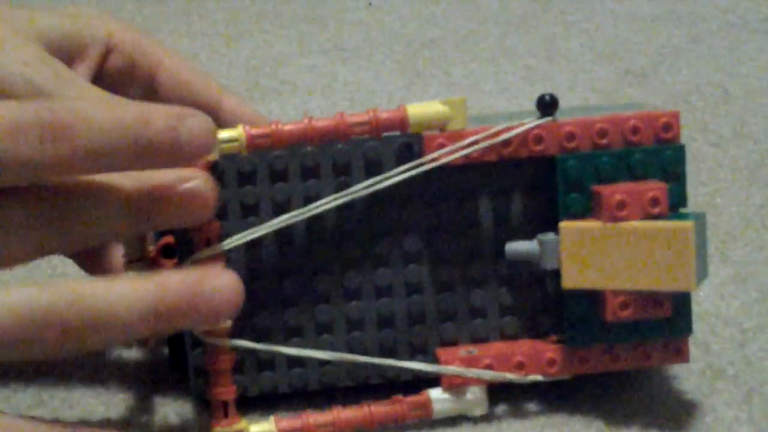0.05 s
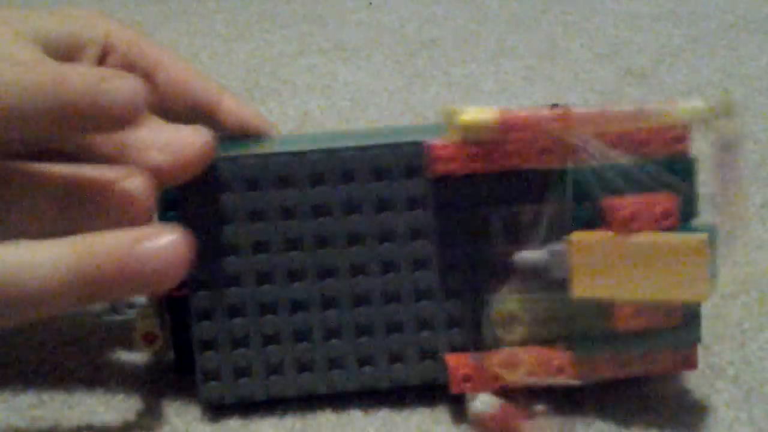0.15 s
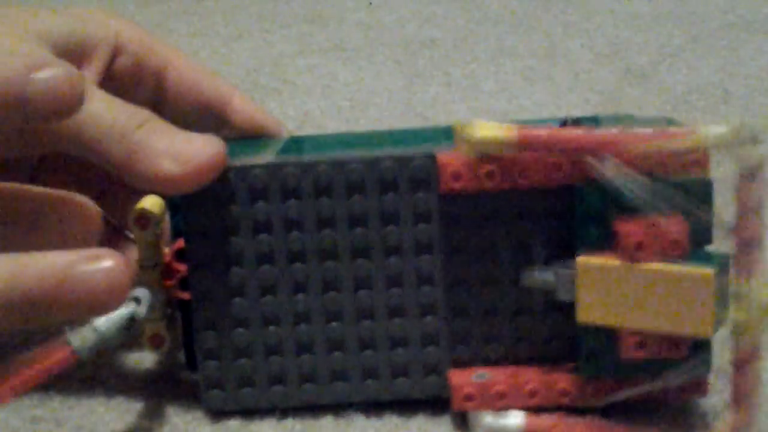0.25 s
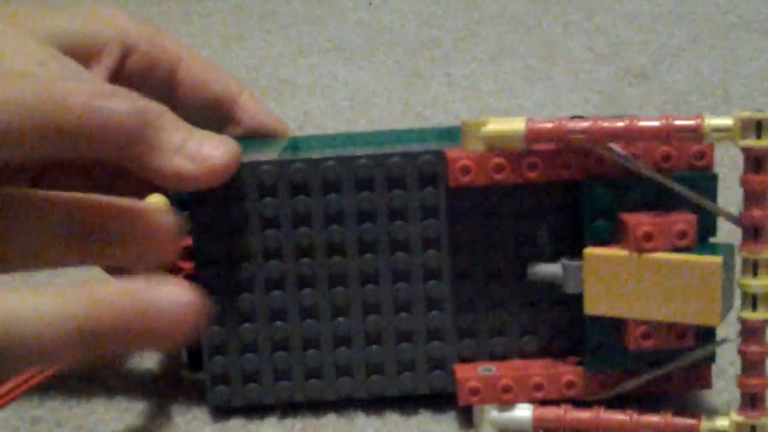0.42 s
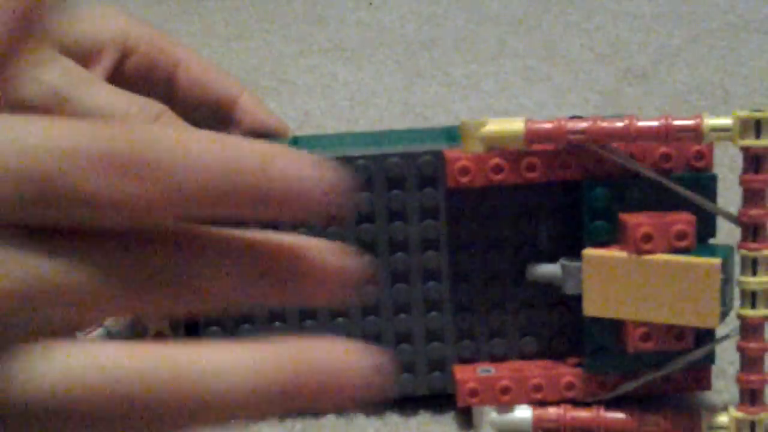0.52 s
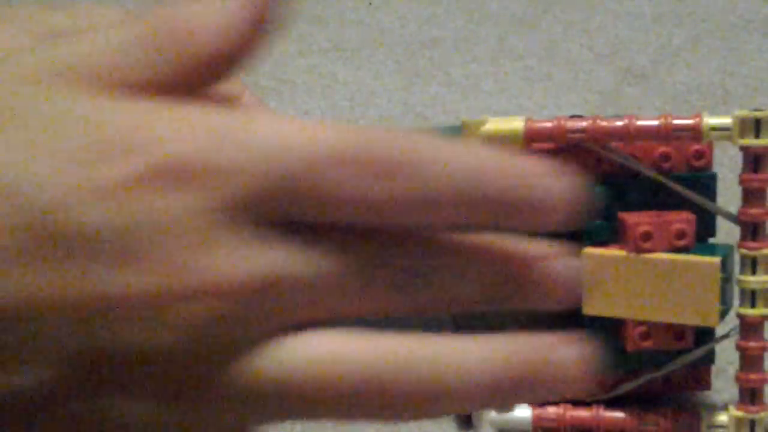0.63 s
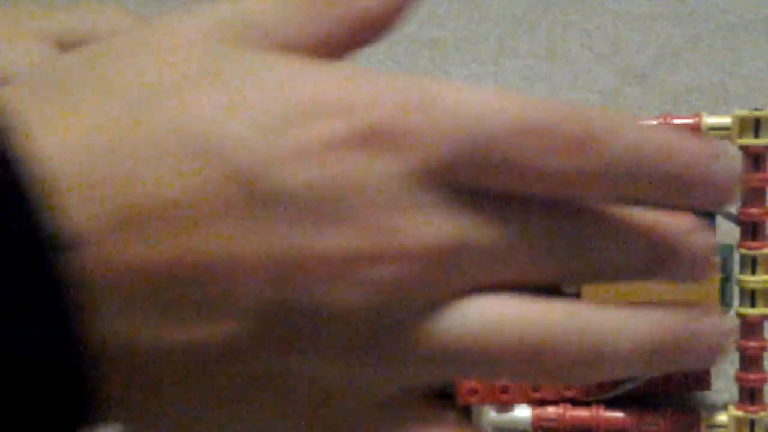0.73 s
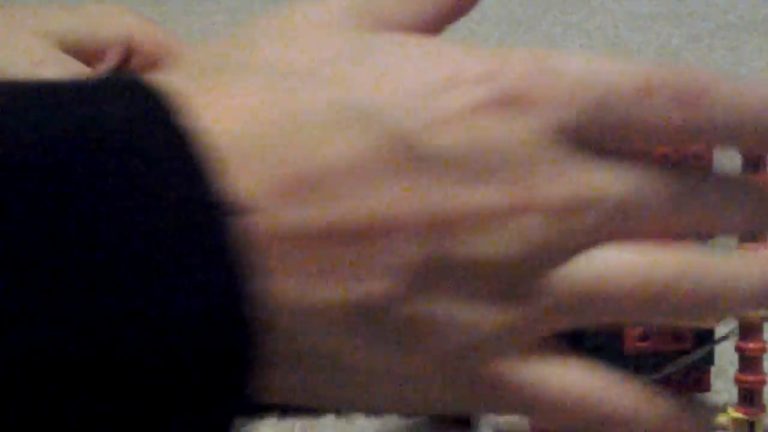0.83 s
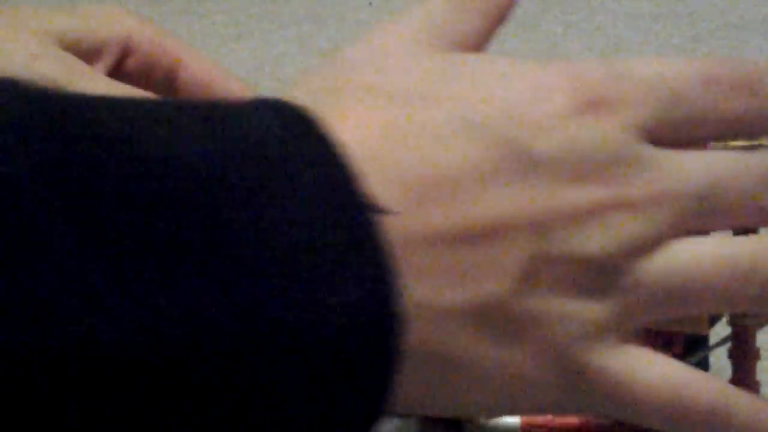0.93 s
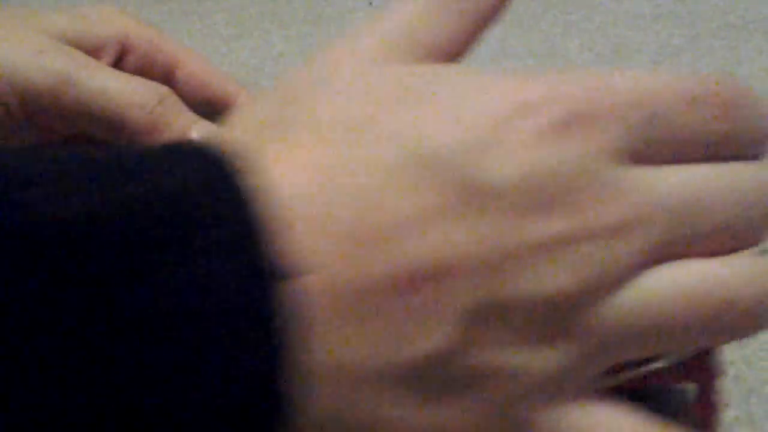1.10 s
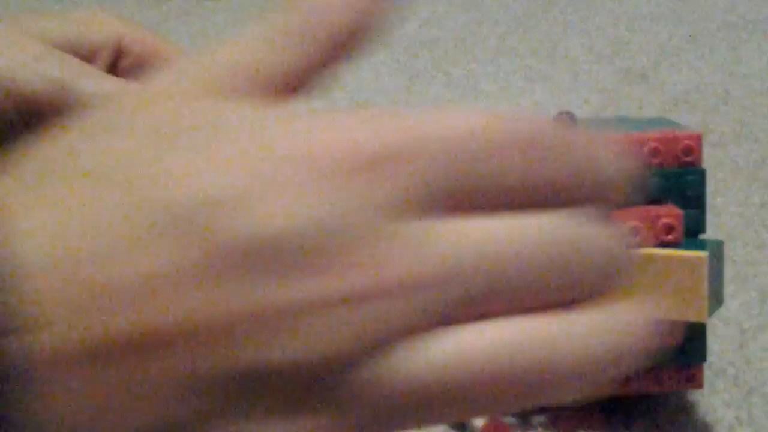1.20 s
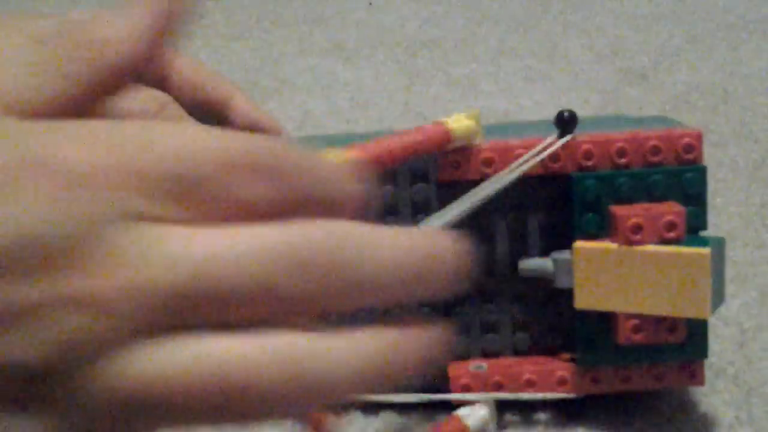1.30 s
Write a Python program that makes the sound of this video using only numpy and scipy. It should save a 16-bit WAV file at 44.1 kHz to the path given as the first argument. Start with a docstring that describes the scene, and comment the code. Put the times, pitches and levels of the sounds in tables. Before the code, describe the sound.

A plastic brick trap snaps shut: after quiet room hiss, a tiny catch click and brief scrape at 0.2 s lead into a loud, bright clack at 0.21 s. Six hard bounces follow about every 0.05 s, fading by 0.53 s, with brick chatter, dull carpet thuds and short room echoes. Soft hand rustle continues, with faint plastic taps near 1.02 and 1.10 s. Close microphone, small carpeted room.

```python
"""A toy mousetrap of plastic bricks snaps shut on a carpet in a small room, close to the microphone.
Room noise and a hand's rustle (shaped noise) run throughout; the arm's hinge scrapes in a swell of noise.
Catch, snap and six bounces follow: modes of base and arm ring, noise cracks, loose bricks chatter,
the base thuds on the carpet and the walls throw each clack back. Later a hand taps the trap three times."""
import sys
import numpy as np
from scipy import signal
from scipy.fft import irfft
from scipy.io import wavfile

SR = 44100
rng = np.random.default_rng(int(sys.argv[2]) if len(sys.argv) > 2 else 0)


def bounce(signal):
    """Save signal as a 16-bit WAV file at the path given by the first command-line argument."""
    frames = np.transpose(np.atleast_2d(signal))
    limited = np.clip(frames, -1, 1)
    pcm = np.round(limited * 32767).astype(np.int16)
    wavfile.write(sys.argv[1], SR, pcm)


N = 59535

# Room noise and microphone hiss: frequency_hz, relative_density_db
FLOOR_SPECTRUM = [(15, -52), (25, -31), (97, -2.5), (228, -3.5), (349, -6), (644, -9.5), (775, -7.5),
                  (934, -14), (1360, -12), (1970, -18), (2190, -14.5), (6350, -22), (14500, -17.5)]
# Moving hand and sleeve: time_s, level_db
RUSTLE_LEVEL = [(0, -80), (.14, -76), (0.191, -53.5), (.6, -57), (.75, -65), (.95, -58.5), (1.12, -59.5),
                (1.35, -76.5)]
# Spectrum of rustle and hinge scrape: frequency_hz, relative_level_db
FRICTION_SPECTRUM = [(60, -13), (200, 4.5), (600, -0.5), (2000, -2.5), (5000, -7.5), (9000, -8.5),
                     (15000, -20)]
# Catch, snap, six bounces, three hand taps, each level relative to its layer:
# start_s, base_knock_db, arm_ring_db, favoured_pitch_hz, crack_db, chatter_db, thud_db
BLOWS = [ (0.203, -27, -36, 7000, -20.5, -34, -44), (.2100, 0, 3, 7100, -1.5, -1.5, -8),
         (0.2703, -7, 2, 3430, -4.5, -1.5, -8.5), (0.3262, -4.5, -5, 7700, -2, -6, -5),
         (0.3792, -11, -1.5, 2800, -11, -14.5, -9), (0.4296, -14.5, -10, 3300, -13.5, -19, -9),
         (0.4784, -20.5, -20, 2870, -19, -23, -5.5), (0.5264, -25, -26, 2730, -25, -26.5, -11.5),
         (1.0162, -33.5, -33, 2750, -40, -47, -50), (1.0227, -28.5, -32, 6200, -34, -48, -32),
         (1.1020, -46, -44, 2600, -56, -58, -46), ]
# Nominal modes of the hollow base: pitch_hz, level_db, t60_s
BASE_MODES = [(220, -27.5, .035), (351, -24, 0.036), (589.5, -18.5, 0.044), (864, -16, .017),
              (1028, -13.5, 0.02), (1218, -12, 0.023), (1399, -21.5, 0.015), (1666, -23.5, 0.026)]
# Nominal modes of the arm and its pegs: pitch_hz, level_db, t60_s
ARM_MODES = [(2484, -24.5, 0.049), (2798, -24, 0.025), (3140, -21, 0.023), (3470, -21.5, 0.024),
             (3746, -26, 0.019), (4890, -24, 0.015), (6150, -32, .025), (6560, -24, 0.029),
             (7180, -22, .018), (7800, -28, .018)]
# Dense high modes of the bricks: frequency_hz, relative_level_db
CRACK_SPECTRUM = [(100, -28), (400, -9), (1000, -2), (1900, -10), (3000, -3), (4700, -3), (5800, -5),
                  (7400, 1.5), (9200, -6), (12000, -10.5), (15000, -19)]
# Reflections from nearby surfaces: delay_s, gain_db
NEAR_ECHOES = [(.0022, -12), (.0058, -17.5), (0.016, -12.5), (.0205, -13.5), (.0245, -19.5)]
# Room bands: frequency_hz, first_wall_echoes_db, tail_db, tail_t60_s
ROOM_BANDS = [(120, -25, -24, .3), (300, -13, -11, 0.44), (606, -15.5, -10, 0.31), (1230, -13, -10, 0.31),
              (2340, 2.5, -1, 0.22), (4750, 2, 0, 0.24), (7500, -2.5, -0.5, 0.25), (14000, -7.5, -3, 0.29)]

FLOOR_DB = -56
SWING_START_S, SWING_END_S, SWING_END_DB, SWING_GROWTH_DB = 0.188, 0.21, -36.5, 22
STRIKE_SPREAD_DB, DETUNE_RATIO = 1.5, 0.017  # standard deviations per mode and strike
FOCUS_DB, FOCUS_OCTAVES = 5.5, 0.24  # greatest cut away from the favoured pitch; width
CRACK_DB, CRACK_RISE_S, CRACK_T60_S = -9, 0.00071, 0.016
DULLING_ABOVE_HZ, DULLING_PER_OCTAVE = 7500, 0.35  # dB per octave per dB of crack level
CHATTER_DB, CHATTER_DELAY_S, CHATTER_T60_S = -15, 0.0055, 0.054
CLICKS_PER_S, CLICK_T60_S = 900, 0.0046
LOW_CUT_HZ = 175  # the trap's blows carry little sound below this
THUD_DB, THUD_HZ, THUD_DELAY_S, THUD_WIDTH_S = -25, 223.5, 0.00807, 0.004
LANDING_DB = -11  # added to the blow's thud_db
BOOM_DB, BOOM_HZ, BOOM_T60_S = -39.5, 75.5, 0.033
BOOM_GROWTH = 1.9  # dB per dB of knock: only hard blows shake the floor
WALLS_S, WALLS_RISE_S, WALLS_T60_S, TAIL_RISE_S = 0.0139, 0.0043, 0.064, 0.011
BAND_EDGE_HZ, CEILING = 14850, 0.62  # ceiling in full-scale amplitude


def amp(db):
    """Decibels to gain."""
    return 10 ** (np.asarray(db) / 20)


def evened(x):
    """Scales to unit rms."""
    return x / np.sqrt(np.mean(x ** 2) + 1e-20)


def read(points, hz):
    """Interpolates a spectrum table on a log-frequency axis."""
    point_hz, value = np.transpose(points)
    return np.interp(np.log(hz + 1), np.log(point_hz + 1), value)


def fade(t, t60_s):
    """Exponential decay of 60 dB in t60_s."""
    return np.exp(-np.log(1000) * np.maximum(t, 0) / t60_s)


def add(mix, start_s, sound):
    """Mixes a sound in at a time."""
    part = mix[max(round(start_s * SR), 0):][:len(sound)]
    part += sound[:len(part)]


def noise(spectrum, size):
    """Random-phase noise of unit rms with the given spectrum."""
    hz = np.fft.rfftfreq(size, 1 / SR)
    phase = np.exp(2j * np.pi * rng.random(len(hz)))
    return evened(irfft(amp(read(spectrum, hz)) * phase, size))


def room_floor():
    """Steady room noise and microphone hiss."""
    return amp(FLOOR_DB) * noise(FLOOR_SPECTRUM, N)


def rustle():
    """Skin and cloth slide around the trap: friction noise under a slow level curve."""
    level_db = np.interp(np.arange(N) / SR, *np.transpose(RUSTLE_LEVEL))
    return amp(level_db) * noise(FRICTION_SPECTRUM, N)


def swing():
    """The arm scrapes in its hinge, louder as it gathers speed."""
    out = np.zeros(N)
    progress = np.linspace(0, 1, round((SWING_END_S - SWING_START_S) * SR))
    level_db = SWING_END_DB - SWING_GROWTH_DB * (1 - progress)
    scrape = noise(FRICTION_SPECTRUM, N)[:len(progress)]
    add(out, SWING_START_S, amp(level_db) * scrape)
    return out


def ring(modes, t):
    """Decaying modes, struck with slightly different weights and pitches each time."""
    total = np.zeros(len(t))
    for k, (hz, db, t60_s) in enumerate(modes):
        level_chance, pitch_chance = rng.standard_normal(2)
        level = (-1) ** k * amp(db + STRIKE_SPREAD_DB * level_chance)  # alternating polarity
        pitch_hz = hz * (1 + DETUNE_RATIO * pitch_chance)
        total += level * fade(t, t60_s) * np.sin(2 * np.pi * pitch_hz * t)
    return total


def arm_modes(favoured_hz):
    """The place where the arm lands decides which of its modes ring most."""
    modes = []
    for hz, db, t60_s in ARM_MODES:
        distance = np.log2(hz / favoured_hz) / FOCUS_OCTAVES
        cut_db = FOCUS_DB * (1 - np.exp(-distance ** 2))
        modes.append((hz, db - cut_db, t60_s))
    return modes


def crack(level_db, t):
    """Dense brick modes as a noise burst; a softer contact is duller."""
    spectrum = []
    for hz, db in CRACK_SPECTRUM:
        octaves_above = max(np.log2(hz / DULLING_ABOVE_HZ), 0)
        spectrum.append((hz, db + DULLING_PER_OCTAVE * level_db * octaves_above))
    envelope = np.minimum(t / CRACK_RISE_S, 1) * fade(t, CRACK_T60_S)
    return amp(CRACK_DB + level_db) * noise(spectrum, len(t)) * envelope


def chatter(t):
    """Loose bricks click against each other: noise under random click envelopes."""
    happens = rng.random(len(t)) < CLICKS_PER_S / SR
    clicks = happens * rng.uniform(0.79, 1, len(t))
    clicks[0] = 1
    power = signal.fftconvolve(clicks ** 2, fade(t, CLICK_T60_S) ** 2)[:len(t)]
    envelope = evened(np.sqrt(abs(power)))
    return envelope * noise(CRACK_SPECTRUM, len(t)) * fade(t, CHATTER_T60_S)


def room(x, size):
    """Near reflections, a bright cluster of wall echoes and a short tail, scattered anew per call."""
    t, hz = np.arange(size) / SR, np.fft.rfftfreq(size, 1 / SR)
    wall_phase, tail_phase = np.exp(2j * np.pi * rng.random((2, len(hz))))
    wall_rise = np.clip((t - WALLS_S) / WALLS_RISE_S, 0, 1)
    cluster = evened(wall_rise * fade(t - WALLS_S, WALLS_T60_S))
    wall_gain = amp(read([row[:2] for row in ROOM_BANDS], hz))
    response = cluster * irfft(wall_phase * wall_gain, size)
    for (_, _, tail_db, t60_s), shares in zip(ROOM_BANDS, np.eye(len(ROOM_BANDS))):
        # Triangular bands cross-fade between neighbours
        band = read([(row[0], share) for row, share in zip(ROOM_BANDS, shares)], hz)
        envelope = evened(np.minimum(t / TAIL_RISE_S, 1) * fade(t, t60_s))
        response += amp(tail_db) * irfft(tail_phase * band, size) * envelope
    for delay_s, db in NEAR_ECHOES:
        add(response, delay_s, amp([db]))
    return signal.fftconvolve(x, response)


def trap():
    """Every blow rings base and arm, cracks, shakes the bricks and excites the room."""
    out, t = np.zeros(N), np.arange(SR // 5) / SR
    for start_s, knock_db, arm_db, favoured_hz, crack_db, chatter_db, _ in BLOWS:
        blow = amp(knock_db) * ring(BASE_MODES, t)
        blow += amp(arm_db) * ring(arm_modes(favoured_hz), t)
        blow += crack(crack_db, t)
        add(blow, CHATTER_DELAY_S, amp(CHATTER_DB + chatter_db) * chatter(t))
        add(out, start_s, blow)
        add(out, start_s, room(blow, size=16384))
    low_cut = signal.butter(4, LOW_CUT_HZ, "high", fs=SR, output="sos")
    return signal.sosfilt(low_cut, out)


def thuds():
    """The base is pushed into the carpet and rocks back: dead thud, light landing knock, faint boom."""
    out, t = np.zeros(N), np.arange(SR // 10) / SR
    from_peak_s = t - THUD_DELAY_S
    pulse = np.exp(-(from_peak_s / THUD_WIDTH_S) ** 2) * np.cos(2 * np.pi * THUD_HZ * from_peak_s)
    boom = fade(t, BOOM_T60_S) * np.sin(2 * np.pi * BOOM_HZ * t)
    for start_s, knock_db, *_, thud_db in BLOWS:
        add(out, start_s, amp(THUD_DB + thud_db) * pulse)
        landing = amp(LANDING_DB + thud_db) * ring(BASE_MODES[1:4], t)
        add(out, start_s + THUD_DELAY_S, landing)
        add(out, start_s, amp(BOOM_DB + BOOM_GROWTH * knock_db) * boom)
    return out


def scene():
    """The trap in its room over a quiet floor, one channel."""
    return (room_floor() + rustle() + swing() + trap() + thuds())[None]


def record(dry):
    """The microphone rounds off the highest peaks; then the band limit."""
    rounded = CEILING * np.tanh(dry / CEILING)
    low_pass = signal.firwin(301, BAND_EDGE_HZ, window=("kaiser", 9), fs=SR)
    return signal.oaconvolve(rounded, low_pass[None], "same")


dry = scene()
out = record(dry)
bounce(out)
```